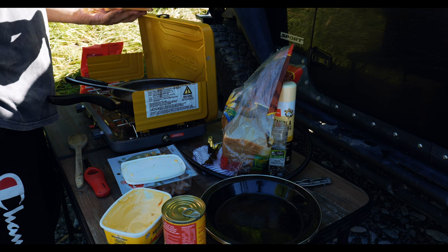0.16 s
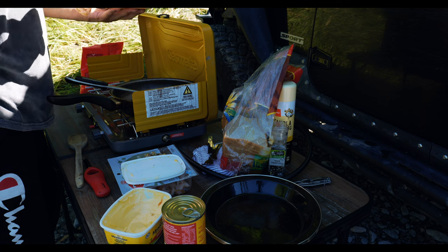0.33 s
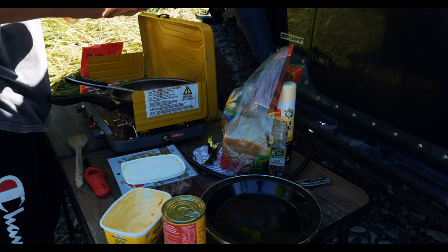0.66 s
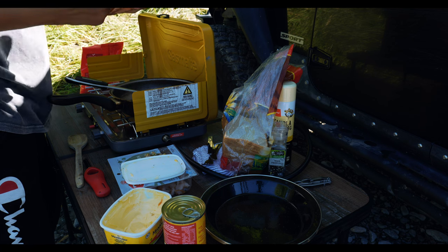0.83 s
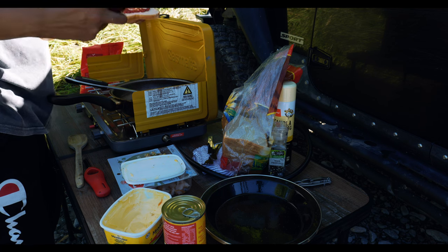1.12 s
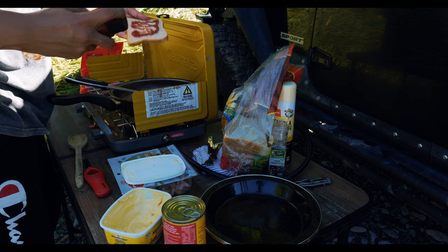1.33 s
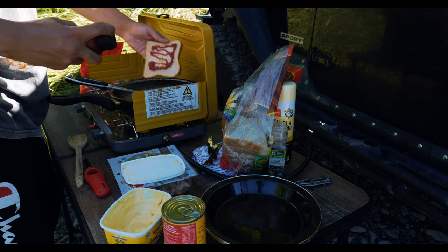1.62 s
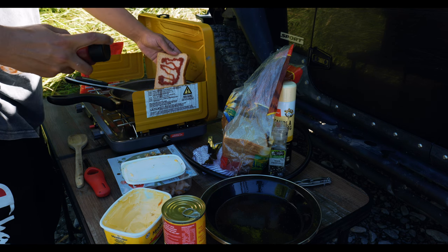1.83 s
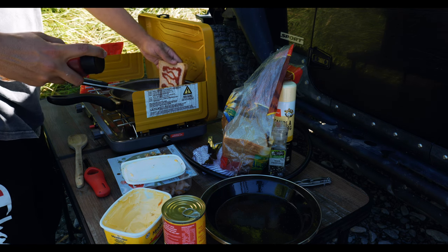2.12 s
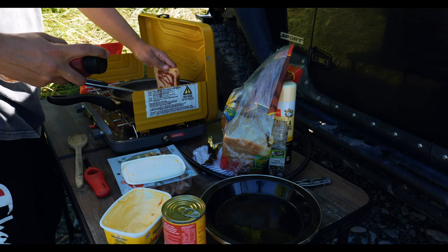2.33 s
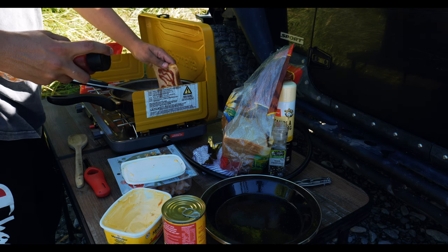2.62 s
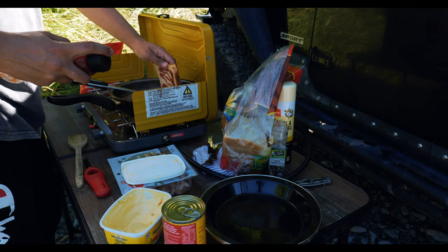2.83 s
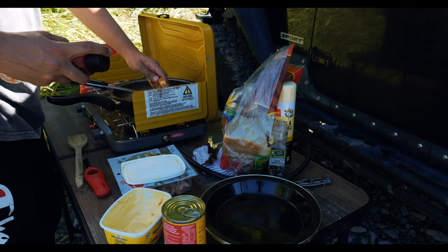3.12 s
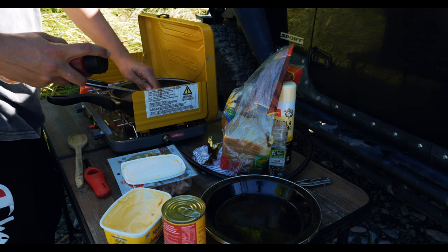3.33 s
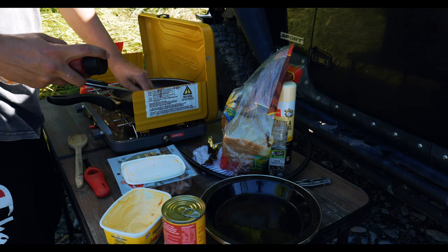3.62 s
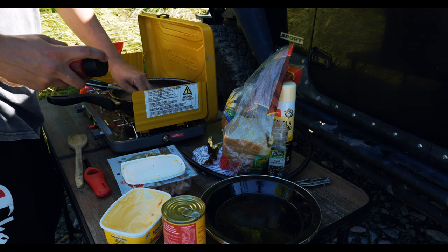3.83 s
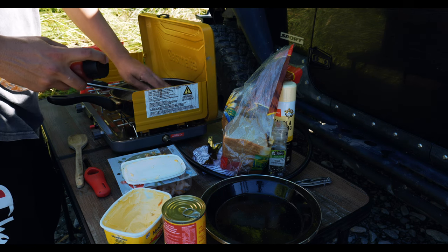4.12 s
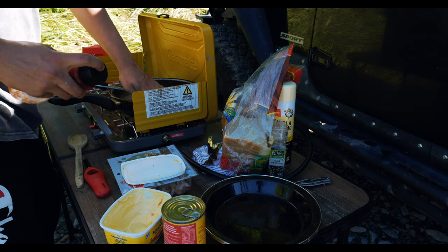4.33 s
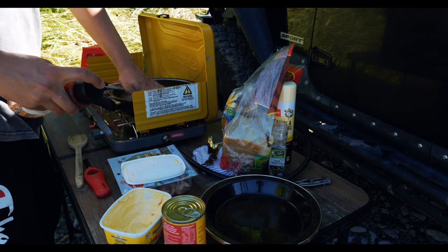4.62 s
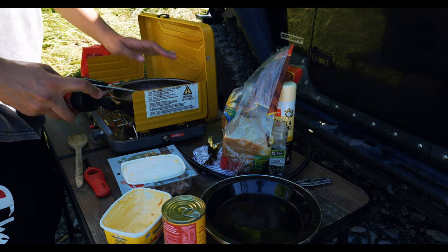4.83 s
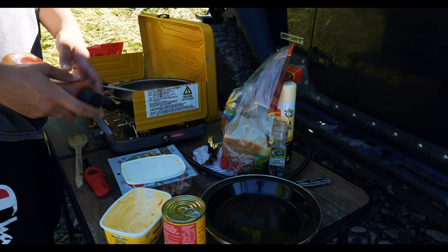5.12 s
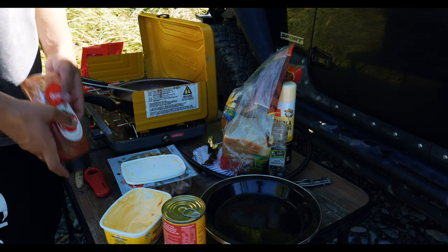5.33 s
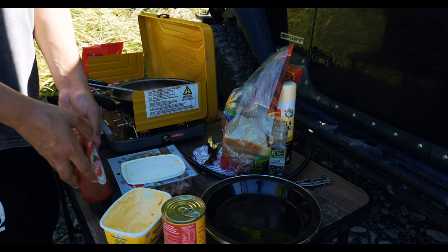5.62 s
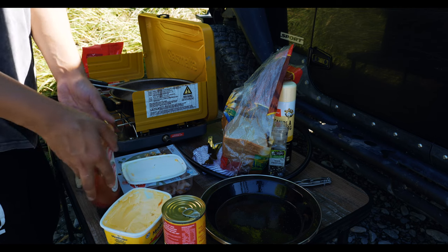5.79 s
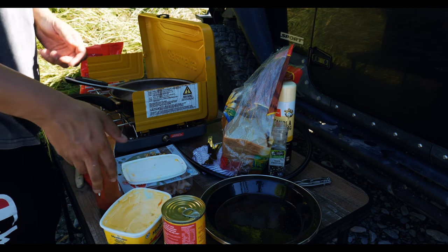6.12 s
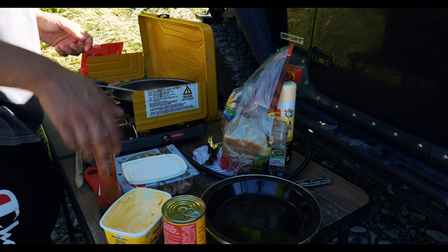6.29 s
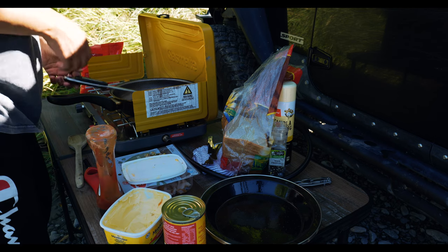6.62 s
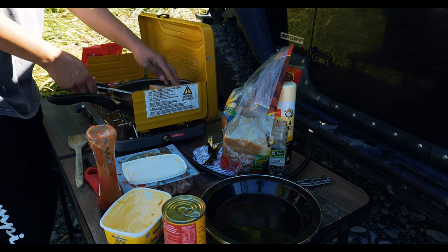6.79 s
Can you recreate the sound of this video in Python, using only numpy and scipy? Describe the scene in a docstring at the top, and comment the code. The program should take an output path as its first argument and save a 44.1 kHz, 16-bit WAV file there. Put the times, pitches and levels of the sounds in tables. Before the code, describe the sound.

Outdoor camp cooking: faint pan hiss, soft gas burner rumble, steady cicada drone, distant birds chirping, and a few sharp hollow plastic clacks.

```python
"""An outdoor camp kitchen: a near cicada buzzes in bursts over a far chorus, a gas burner rumbles, the pan hisses faintly.
A plastic bottle's cap snaps and knocks, the bottle is set down among the tins, hands brush the table, birds call far off.
Chorus, hiss and flame are coloured noise; a thin flickering tone and the bird calls are wavering sine tones.
The near cicada is a train of clicks through sharp resonances; the bottle is fading tones plus short cracks.
Brushes on the table are grainy noise, and a low fading tone is the table top flexing."""
import sys
import numpy as np
from scipy import signal
from scipy.fft import rfft, irfft, next_fast_len
from scipy.io import wavfile
from scipy.ndimage import uniform_filter1d, map_coordinates

SR = 44100
rng = np.random.default_rng(int(sys.argv[2]) if len(sys.argv) > 2 else 0)


def digitize_waveform(pressure):
    """Quantize a signal to 16-bit integers and store it at the path in sys.argv[1].

    Rows of a 2-D input are taken as channels; values are limited to [-1, 1].
    """
    field = np.atleast_2d(pressure).T
    bounded = np.clip(field, -1, 1)
    quanta = np.round(bounded * 32767).astype(np.int16)
    wavfile.write(sys.argv[1], SR, quanta)


N = 306495

# How alike left and right are: pitch_hz, likeness (1 = the same)
LIKENESS = [(250, 1), (500, 0.98), (700, 0.92), (1290, 0.7), (2000, .95), (3000, 1), (4400, 0.91),
            (6000, 0.91), (8120, 1), (10500, 0.55), (15000, 0.14)]
# Which side is louder: pitch_hz, left_over_right_db
SIDE_LEAN = [(450, 0), (950, -.5), (2380, .5), (4400, 2.5), (5980, 2), (8500, 0), (15000, 0)]
# How long echoes of cases and trees last: pitch_hz, t60_s (time to fall 60 dB)
YARD_ECHO = [(200, 0.12), (2000, 0.13), (10000, 0.085)]

# Tone colour of far cicadas and pan hiss: pitch_hz, relative_level_db
FAR_COLOUR = [(2470, -54), (4200, -16), (4440, -21.5), (5710, -4.5), (6180, -3.5), (6910, -3), (8040, -1.5),
              (9250, -2), (10300, -9), (12200, -14), (14700, -31), (15100, -66), (16000, -81)]
# Tone colour of burner and open air: pitch_hz, relative_level_db
BURNER_COLOUR = [(18, -81), (30, -43), (80, -9.5), (166, -8), (244, 3), (309, -6.5), (445, -5),
                 (683, -19.5), (1000, -11.5), (1190, -14), (2080, -15), (3300, -19), (4040, -14.5),
                 (4400, -23), (5000, -10.5), (6500, -41), (11000, -120)]
# One thin flickering tone: pitch_hz, waver_hz, level_db
THIN_TONE = (2810, 25, -67)
CHORUS_DB, BURNER_DB = -37.5, -52  # average levels
DRIFT_DB = 0.47  # size of the flame's slow unsteadiness

# Hoarse bird notes: start_s, length_s, first_pitch_hz, last_pitch_hz, level_db
TWITTER_NOTES = [(0.15, 0.025, 3600, 3500, -51), (.172, .03, 4400, 3600, -51),
                 (.193, .014, 4000, 4100, -50), (.207, .022, 4160, 3800, -48),
                 (.225, .035, 3700, 3800, -51), (0.263, 0.035, 3800, 4400, -47),
                 (.268, .05, 3680, 3620, -49), (.295, .035, 4350, 3950, -46),
                 (0.348, 0.016, 3330, 3320, -44), (.367, .024, 3400, 3350, -48),
                 (0.38, 0.038, 4350, 4220, -48), (.43, .045, 4050, 3500, -52),
                 (.485, .035, 3600, 3700, -55), (1.107, 0.08, 4700, 3900, -49),
                 (1.648, 0.097, 4090, 4400, -49.5), (1.733, 0.082, 3900, 3500, -54),
                 (2.11, 0.06, 3850, 4100, -47), (2.3, .07, 4080, 4020, -53), (2.35, .15, 3680, 3800, -56.5),
                 (2.6, .035, 3700, 3750, -57), (2.808, 0.035, 4650, 3970, -48),
                 (2.872, .04, 3640, 4120, -44), (2.905, .04, 4050, 3050, -50),
                 (2.865, 0.065, 3380, 3330, -50), (2.95, .1, 3770, 3780, -58),
                 (3.075, .05, 4270, 4300, -54), (3.125, .075, 3350, 3660, -55),
                 (3.25, .08, 3530, 3200, -59), (3.477, 0.11, 3800, 3680, -54), (3.49, .08, 4150, 4250, -55),
                 (3.57, .11, 4050, 3800, -55), (3.68, .07, 4000, 3950, -55), (3.7, .09, 3650, 3700, -54),
                 (3.53, .045, 3330, 3280, -57), (3.722, .025, 4090, 3900, -53),
                 (3.795, 0.06, 3650, 3320, -49), (3.85, .065, 3350, 3400, -53), (3.8, .09, 3950, 4100, -55),
                 (4.283, .018, 4700, 3900, -52), (4.296, 0.055, 3820, 4120, -46.5),
                 (4.357, .045, 4350, 4400, -50), (4.39, .04, 4250, 3750, -50), (4.42, .03, 3800, 4050, -53),
                 (4.455, 0.055, 4100, 4050, -50), (5.353, 0.075, 3880, 3980, -50),
                 (5.46, .05, 3950, 3950, -53), (5.38, .06, 3500, 3650, -53), (5.503, .055, 3380, 3480, -50),
                 (5.568, .025, 4020, 3900, -49), (5.585, .035, 3950, 4020, -49),
                 (5.705, 0.056, 4250, 3550, -53)]
# Clear whistles and sweeps: start_s, length_s, first_pitch_hz, last_pitch_hz, level_db
WHISTLE_NOTES = [(0.13, 0.08, 2340, 2270, -55), (0.315, 0.035, 3050, 3850, -48),
                 (.338, .018, 3850, 3920, -44), (0.898, 0.18, 3900, 3600, -55),
                 (2.157, 0.146, 4130, 4080, -44.5), (2.54, 0.072, 4900, 2750, -48.5),
                 (2.572, .02, 3800, 3700, -47), (3.42, 0.044, 1330, 1200, -57),
                 (3.47, 0.128, 1350, 1400, -55), (3.579, 0.036, 2660, 2500, -55),
                 (4.093, .016, 2800, 2780, -54), (4.098, .018, 2450, 2280, -51),
                 (4.11, .018, 2250, 1750, -54), (4.17, .045, 3100, 3400, -61), (4.37, 0.1, 1620, 1650, -55),
                 (4.29, .07, 1500, 1620, -61), (4.27, 0.032, 3100, 4200, -58),
                 (4.31, 0.03, 3750, 2300, -57), (4.322, .016, 2820, 2790, -53),
                 (4.335, .022, 2280, 2250, -57), (4.18, .045, 1630, 1680, -60),
                 (4.45, .025, 1700, 1300, -55), (4.24, .04, 2580, 2560, -58),
                 (4.561, .035, 2300, 1800, -58), (5.1, .015, 3900, 4000, -53),
                 (5.155, .05, 2920, 2930, -57), (2.31, .04, 2150, 3150, -55),
                 (2.342, .025, 3050, 3280, -54), (2.36, .035, 3300, 3150, -54),
                 (2.388, .055, 3180, 2400, -56), (4.63, 0.044, 2280, 2320, -54),
                 (4.675, 0.095, 2420, 2590, -52), (4.66, 0.063, 4050, 4090, -51),
                 (4.715, 0.12, 4170, 4190, -45.5), (4.83, 0.13, 4130, 4050, -55),
                 (4.82, .06, 2550, 2580, -57), (7.6, 0.03, 4260, 3600, -51), (6.885, .06, 2810, 4100, -58)]
HOARSE_HZ, CLEAR_HZ = 78, 16  # basic pitch shake, weighted by the two shake speeds below
GLIDE_EASES = 1.1  # above 1, a glide starts fast and levels off
SECOND_HZ, SECOND_DB = 220, -10  # second side of a hoarse throat: typical pitch offset, level against the first

# Near cicada over time: time_s, burst_lead_cycles, level_db
SINGER_PATH = [(0, 0.06, -36.5), (.9, 0.01, -37.5), (1.2, 0.13, -37), (1.6, 0.13, -37.5),
               (2.4, -0.021, -36), (2.7, -0.087, -37.5), (3.6, -.11, -38.5), (4, -0.09, -39),
               (4.3, -.16, -37), (4.7, -.19, -39), (5.5, -.11, -37), (6, -0.081, -40.5),
               (6.7, 0.025, -37.5), (6.95, 0.016, -36)]
# Four buckling clicks that repeat through a burst: relative_level_db
RIB_CLICKS_DB = [0, -2.5, -6, -6]
# Tone colour of the cicada's body: pitch_hz, relative_level_db
SONG_COLOUR = [(2470, -27.5), (4200, -21), (4330, -18.5), (4620, -11), (5140, -4), (5680, 0.5), (6160, -3),
               (7130, 1), (8040, -6.5), (9500, -2), (10300, -16), (12000, -17), (14000, -32)]
# Sharp resonances of the body: pitch_hz, width_hz, relative_level_db
SHELL_RINGS = [(4880, 48, -13), (5315, 45, 0), (5630, 41, -10), (5780, 65, -0.5), (5910, 29, 0.5),
               (6210, 77, -2), (6425, 64, -2.5), (6600, 26, -1), (6930, 19, 1), (6860, 79, -3.5),
               (7030, 49, -6.5), (7150, 55, 1), (7640, 110, -3), (8250, 74, -4.5), (9020, 80, -7),
               (9290, 40, -0.5), (9760, 81, -5)]
BURSTS_HZ = 24.75  # burst cycles a second, before the changing lead

# Brushes and set-downs: start_s, t60_s, starting_level_db, brightness_db_per_octave
TABLE_BRUSHES = [(3.56, 0.17, -50, 2), (4.055, 0.21, -46.5, -5.5), (4.451, 0.1, -48, 0.5),
                 (5.181, 0.13, -50, 2), (5.771, 0.08, -19.5, -0.5), (5.779, .07, -21, 0),
                 (5.782, .067, -26, -9), (5.789, .08, -23, 1), (5.8, .07, -28, 4), (5.81, .09, -30, 1),
                 (5.832, 0.16, -35.5, -3.5), (5.852, .06, -40, 1), (5.895, .12, -44, -1),
                 (5.922, .15, -45, 1), (5.945, .1, -45, -4), (5.965, .2, -49, -2), (6.03, 0.98, -53.5, 1.5),
                 (6.148, .12, -51, 2), (6.434, 0.2, -49.5, -1), (6.564, .3, -49.5, -4), (6.578, .1, -45, 0),
                 (6.596, .04, -40, -3), (6.609, .09, -37, 3), (6.619, .07, -35, 0), (6.637, 0.1, -33, 4.5),
                 (6.646, .08, -39.5, 0), (6.66, .09, -39, 2), (6.674, .1, -43, 0), (6.69, .15, -45, -2),
                 (6.72, .15, -47.5, -2), (6.741, 0.14, -43, -5), (6.899, 0.25, -45.5, -4)]
# Tone colour of the loaded table top: pitch_hz, relative_level_db
TABLE_COLOUR = [(35, -49), (60, -42), (124, -8), (621, -6), (698, -3.5), (862, -13), (1040, -4),
                (1910, -14), (2350, -15), (3190, -25), (4750, -19.5), (5090, -27), (9790, -22.5),
                (14600, -39), (16000, -50)]
# The table top flexes under the bottle: start_s, pitch_hz, level_db, t60_s
TABLE_THUMP = (5.774, 145, -15.5, 0.07)
RISE_S = .0015  # time constant of every brush's rise

# Bottle tones, first the air inside, then the walls: pitch_hz, relative_level_db, t60_s (before length_ratio)
BOTTLE_RINGS = [(229.5, -0.5, 0.088), (316, -3.5, 0.063), (388, -2, 0.035), (490, -11, 0.037),
                (580, -1, 0.06), (688, -7, .035), (867, 0.5, 0.029), (1095, -1.5, 0.024),
                (1267, 1.5, 0.028), (1556, -5, 0.042), (1720, -4, 0.04), (1900, -7.5, 0.043),
                (2100, -7, 0.046), (2360, -6, 0.039)]
# Single taps on the bottle: start_s, crack_db, crack_pitch_hz, edge_db, wall_db,
# grip_pitch_hz (wall pitch favoured by the grip), hollow_db, left_over_right_db, length_ratio
BOTTLE_TAPS = [(1.371, -28, 2043, -25, -39, 900, -43, 1.5, 0.93),
               (1.4341, -9, 3900, -6.5, -19, 585, -40, 1, 1.05),
               (1.537, -60, 600, -30, -65, 420, -35, -3, .9),
               (4.734, -42, 1200, -30, -44, 900, -36.5, 2, 1),
               (5.427, -42, 1600, -30, -38, 1600, -60, 7, 1),
               (5.7716, -11, 1500, -7, -24, 1070, -29, 1.5, .9),
               (6.621, -45, 900, -30, -37, 600, -60, 1, .8), (6.743, -42, 1200, -25, -42, 450, -46, 1, .8)]
# Knocks of several contacts (blow, chatter, seating): the columns of a tap, then chatter_delay_s,
# chatter_pitch_hz, seating_delay_s, seating_pitch_hz, seating_grip_pitch_hz, rebound_over_blow_db
COMPOUND_KNOCKS = [(1.1889, -1, 1600, -14, -15, 600, -23, 2.1, .7, 0.00071, 3400, 0.0046, 1800, 520, -4.5),
                   (4.7777, -20, 1080, -60, -18, 1050, -18.5, 1.4, 0.91, 0.00092, 1150, .0032, 400, 375, 6.5),
                   (5.4357, -3, 1830, -22, -13.5, 1830, -15.5, 3.3, 1.07, 0.00119, 3800, .0055, 2300, 825, -1)]
CRACK_T60 = 0.023  # seconds for the crack's noise to fall 60 dB
CHATTER_DB, CHATTER_WALL_DB = -4, -9.5  # cap chatter just after the blow: crack and wall over the rebound
# Cap seating: crack, wall and hollow ring over the rebound; the edge over the blow's own edge
SEAT_CRACK_DB, SEAT_EDGE_DB, SEAT_WALL_DB, SEAT_HOLLOW_DB = -6, -13, 4.5, -2.5
MODE_SPREAD_RAD = 0.36  # typical left/right phase shift of a bottle tone at 2 kHz; higher tones shift more

TOP_HZ = 15800  # nothing is kept above this


def amp(db):
    """Turns dB into a gain."""
    return 10 ** (np.asarray(db) / 20)


def unit(x):
    """Scales a sound to an average strength (rms) of 1."""
    return x / np.sqrt(np.mean(x ** 2) + 1e-20)


def along(points, hz):
    """Reads a curve of (Hz, value) points, with pitch spaced by ratio as we hear it."""
    f, v = np.transpose(points)
    return np.interp(np.log(hz + 1), np.log(f + 1), v)


def curves(rows):
    """Gives one value per sample for each column after the time."""
    s, *columns = np.transpose(rows)
    return [np.interp(np.arange(N) / SR, s, column) for column in columns]


def wobble(rate, size=N):
    """Draws a smooth random curve through `rate` random points a second."""
    points = rng.standard_normal(int(size * rate / SR) + 4)
    return map_coordinates(points, [np.arange(size) * rate / SR])


def filtered(x, response):
    """Changes the strength and phase of each frequency in a sound."""
    m = next_fast_len(x.shape[-1] + 8192)
    return irfft(rfft(x, m) * response(np.fft.rfftfreq(m, 1 / SR)), m)[..., :x.shape[-1]]


def peak(f, hz, width):
    """One resonance: a part that answers most strongly near its own pitch."""
    return 1j * f * width / (hz * hz - f * f + 1j * f * width)


def shell(f, sharp_db):
    """The cicada's sharp resonances standing on an even response."""
    return 1 + amp(sharp_db) * sum(amp(db) * peak(f, hz, width) for hz, width, db in SHELL_RINGS)


def small(x, hz):
    """Small things push too little air for deep bass, so it is removed below about `hz`."""
    return filtered(x, lambda f: (-f * f / (hz * hz - f * f + 1.2j * f * hz)) ** 2)


def stereo(pair):
    """Mixes two unrelated sounds into left and right, as alike as the microphone pair hears the place."""
    def middle_and_side(hz):
        turn = np.arccos(np.clip(along(LIKENESS, hz), -1, 1)) / 2
        return np.array([np.cos(turn), np.sin(turn)])

    mid, side = filtered(pair, middle_and_side)
    return filtered(np.array([mid + side, mid - side]),
                    lambda hz: amp(np.outer([.5, -.5], along(SIDE_LEAN, hz))))


def add(track, s, sound):
    """Mixes a sound in from second s."""
    part = track[..., round(s * SR):][..., :sound.shape[-1]]
    part += sound[..., :part.shape[-1]]


def echoes(x):
    """Surroundings answer with a noise tail in which each frequency dies at its own speed."""
    hz, t, z = signal.stft(rng.standard_normal((2, SR // 4)), SR, nperseg=256)
    fade = amp(-60 * t / along(YARD_ECHO, hz)[:, None])
    tail = stereo(signal.istft(z * fade, SR, nperseg=256)[1])
    late = np.pad(x, (200, 0))[None]  # 200 samples of extra delay
    return signal.fftconvolve(late, tail / np.linalg.norm(tail[0]), axes=1)


def rush(colour, patchy_db):
    """Many small sounds blend into coloured stereo noise, here with patches of random gain."""
    z = signal.stft(rng.standard_normal((2, N)), nperseg=512)[2]
    patches = uniform_filter1d(rng.standard_normal(z.shape[1:]), 6, 0)  # smooth over pitch
    patches = uniform_filter1d(patches, 12, 1)  # smooth over time
    pair = signal.istft(z * amp(patchy_db * unit(patches)), nperseg=512)[1][:, :N]
    return unit(stereo(filtered(pair, colour)))


def far_chorus():
    """Far cicadas and pan hiss blur into noise coloured by the cicada resonances."""
    level = amp(CHORUS_DB + 0.38 * wobble(1.3))
    return level * rush(lambda f: amp(along(FAR_COLOUR, f)) * shell(f, sharp_db=3.5), patchy_db=0.65)


def burner():
    """The gas flame and open air make low noise whose level drifts slowly and flutters faster."""
    level = amp(BURNER_DB + DRIFT_DB * wobble(2.51) + 0.27 * wobble(9.3))
    return level * rush(lambda f: amp(along(BURNER_COLOUR, f)), patchy_db=2.0)


def thin_tone():
    """One thin sine tone wavers in pitch and flickers in level."""
    hz, width, db = THIN_TONE
    flicker_db = np.minimum(12 * wobble(55), 6)
    level = amp(db + 1.5 * wobble(2.2) + flicker_db)
    return level * np.sin(2 * np.pi * np.cumsum(hz + width * wobble(40)) / SR)


def birds():
    """Gliding whistles; hoarse ones shake fast in pitch and throb; distance blurs them in long echoes."""
    calls = np.zeros(N)
    second = [(s, length, first + SECOND_HZ * rng.normal(), last + SECOND_HZ * rng.normal(), db + SECOND_DB)
              for s, length, first, last, db in TWITTER_NOTES]
    notes = [(*row, HOARSE_HZ) for row in [*TWITTER_NOTES, *second]]
    notes += [(*row, CLEAR_HZ) for row in WHISTLE_NOTES]
    for s, length, first_hz, last_hz, db, shake_hz in notes:
        u = np.linspace(0, 1, int(length * SR))  # 0 to 1 through the note
        glide = last_hz + (first_hz - last_hz) * (1 - u) ** GLIDE_EASES
        pitch = glide + shake_hz * (1.31 * wobble(300, size=len(u)) + .35 * wobble(80.4, size=len(u)))
        throb_db = (0.78 + shake_hz / 19) * wobble(90, size=len(u))
        swell = np.sin(np.pi * u) ** .5
        add(calls, s, amp(db) * unit(amp(throb_db)) * swell * np.sin(2 * np.pi * np.cumsum(pitch) / SR))
    near = echoes(calls)[:, :N]
    far = echoes(near[0])[:, :N]  # echoes of echoes
    return calls * amp([[1.2], [-1.2]]) + amp(-7) * near + amp(-10) * far


def cicada():
    """A ribbed membrane buckles in clicks, 20 slots a cycle, and falls silent for part of each cycle."""
    lead, level_db = curves(SINGER_PATH)
    slot = np.floor(20 * (BURSTS_HZ * np.arange(N) / SR + lead) + .5).astype(int)
    at = np.flatnonzero(np.diff(slot) > 0)  # samples where a new slot begins
    turn = slot[at + 1] / 20 - .05
    gate = 1 / (1 + np.exp(-(np.cos(2 * np.pi * turn) + 0.52) * 5))
    luck = rng.standard_normal((len(at), 2))  # uneven timing and strength
    when = np.clip(at + (9 * luck[:, 0]).astype(int), 0, N - 1)
    click_db = np.take(RIB_CLICKS_DB, slot[at + 1], mode="wrap") + 0.81 * luck[:, 1]
    clicks = np.bincount(when, gate * amp(click_db), N)
    # every click is a clean snap followed by a crumple of the membrane
    puff = signal.fftconvolve(clicks, amp(-60 * np.arange(900) / SR / 0.013))[:N]
    snap = clicks * [[1], [0]]
    crumple = 0.12 * puff * rng.standard_normal((2, N)) * [[1], [1.5]]
    buzz = filtered(snap + crumple, lambda f: amp(along(SONG_COLOUR, f)) * shell(f, sharp_db=7.5))
    return amp(level_db) * unit(stereo(buzz))


def table():
    """Rubbing and set-downs send grainy noise through the table top and the things on it."""
    out, t = np.zeros((2, N)), np.arange(SR // 3) / SR
    for s, t60, db, tilt_db in TABLE_BRUSHES:
        grain_db = 1.6 * wobble(100.0, size=len(t)) + 2.4 * wobble(498.5, size=len(t))
        grains = amp(grain_db) * rng.standard_normal((2, len(t)))

        def colour(f):
            octaves = np.log2((np.minimum(f, 5000) + 20) / 700)
            # the side part is weak in the bass, so both sides get nearly the same bass
            return amp(along(TABLE_COLOUR, f) + tilt_db * octaves) * [f ** 0, 0.67 * f / (f + 4000)]

        mid, side = unit(filtered(grains, colour))
        shape = amp(db - 60 * t / t60) * (1 - np.exp(-t / RISE_S))
        add(out, s, shape * np.array([mid + side, mid - side]))
    s, hz, db, t60 = TABLE_THUMP
    add(out, s, amp(db - 60 * t / t60) * (1 - np.exp(-t / 0.0035)) * np.sin(2 * np.pi * hz * t))
    return small(out, hz=101)


def contacts():
    """All taps, and each compound knock as a blow, a chatter and a seating, in the columns of a tap."""
    yield from BOTTLE_TAPS
    for (s, crack_db, hz, edge_db, wall_db, grip_hz, hollow_db, pan, lasts,
         chatter_s, chatter_hz, seat_s, seat_hz, seat_grip_hz, back_db) in COMPOUND_KNOCKS:
        yield s, crack_db, hz, edge_db, wall_db, grip_hz, hollow_db, pan, lasts
        back_crack_db, back_wall_db = crack_db + back_db, wall_db + back_db
        yield (s + chatter_s, back_crack_db + CHATTER_DB, chatter_hz, edge_db,
               back_wall_db + CHATTER_WALL_DB, grip_hz, -120, pan, lasts)
        yield (s + seat_s, back_crack_db + SEAT_CRACK_DB, seat_hz, edge_db + SEAT_EDGE_DB,
               back_wall_db + SEAT_WALL_DB, seat_grip_hz, hollow_db + back_db + SEAT_HOLLOW_DB, pan, lasts)


def bottle_ring(t, hz, db, t60):
    """One fading tone of the bottle; it reaches left and right at shifted phases."""
    shift = MODE_SPREAD_RAD * (hz / 2000) ** 1.7 * rng.normal() * np.array([[1], [-1]])
    level = amp(db + rng.normal(0, 1) - 60 * t / t60)
    return level * np.sin(2 * np.pi * hz * t + shift) * (1 - np.exp(-t * hz * 3))


def bottle():
    """Each knock rings the air inside, the walls, and cracks at a pitch set by its hardness."""
    out, t = np.zeros((2, N)), np.arange(SR // 6) / SR
    for s, crack_db, hz, edge_db, wall_db, grip_hz, hollow_db, pan, lasts in contacts():
        air, *wall_rings = [bottle_ring(t, f, db, t60 * lasts) for f, db, t60 in BOTTLE_RINGS]
        # walls lose 16 dB per octave away from the pitch the grip favours
        walls = sum(ring * amp(-16 * abs(np.log2(mode[0] / grip_hz)))
                    for ring, mode in zip(wall_rings, BOTTLE_RINGS[1:]))
        # a soft contact pushes longer; its rattle differs a little from left to right
        push = 3 * np.sin(np.pi * np.minimum(t * hz * 3, 1))
        common, own = rng.standard_normal(len(t)), rng.standard_normal((2, len(t)))
        burst = push + amp(-60 * t / CRACK_T60) * (0.7 * common + 0.32 * own)
        crack = filtered(burst, lambda f: peak(f, hz, .9 * hz) ** 2 + amp(edge_db) * peak(f, 9000, 12000))
        bright = amp(wall_db) * walls + amp(crack_db) * crack / np.abs(crack).max()
        hit = amp(hollow_db) * air * amp([[.3], [-.3]]) + bright * amp([[pan / 2], [-pan / 2]])
        add(out, s, hit)
        add(out, s, amp(-16.5) * echoes(hit.mean(axis=0)))
    return small(out, hz=122)


def scene():
    """All sources add up in the air at the microphones."""
    return far_chorus() + burner() + thin_tone() + birds() + cicada() + table() + bottle()


def record(dry):
    """The recorder thins the bass, rounds off the loudest peaks and keeps nothing above its band limit."""
    thin = filtered(dry, lambda hz: (1j * hz / (60 + 1j * hz)) ** 2)
    rounded = thin / (1 + np.abs(thin / .97) ** 6) ** (1 / 6)
    return filtered(rounded, lambda hz: hz < TOP_HZ)


dry = scene()
out = record(dry)
digitize_waveform(out)
```